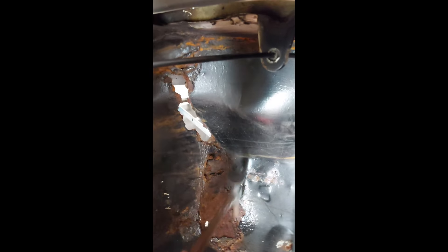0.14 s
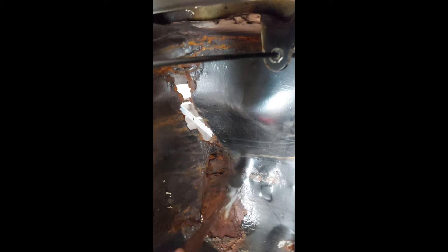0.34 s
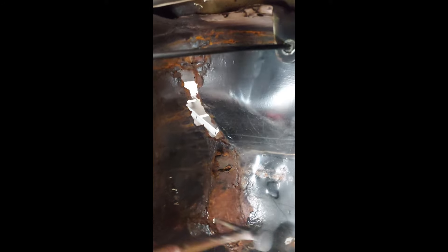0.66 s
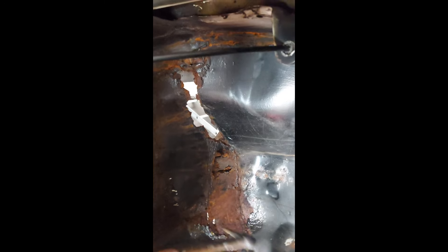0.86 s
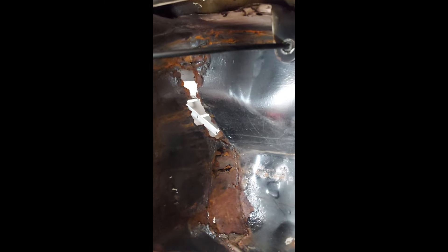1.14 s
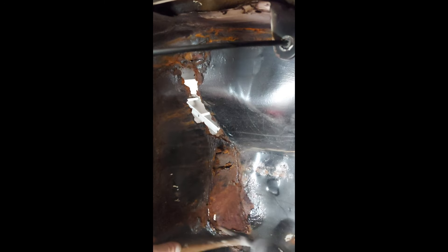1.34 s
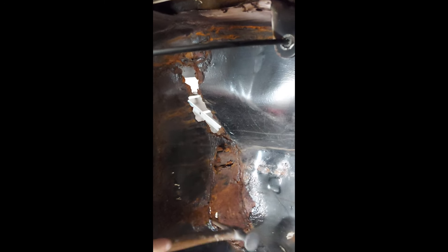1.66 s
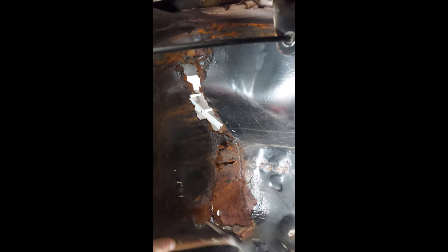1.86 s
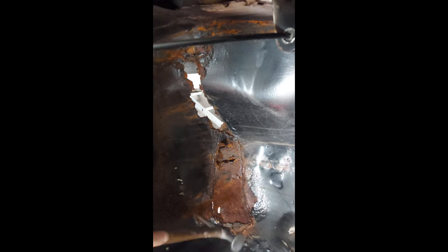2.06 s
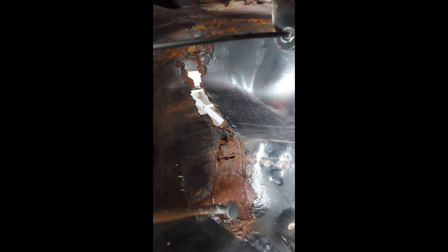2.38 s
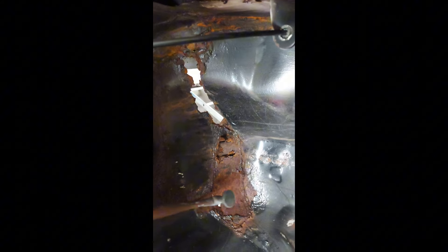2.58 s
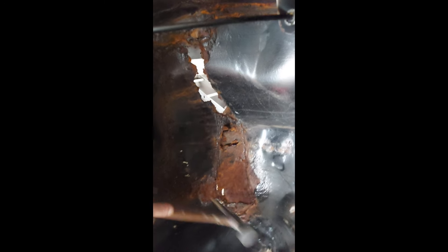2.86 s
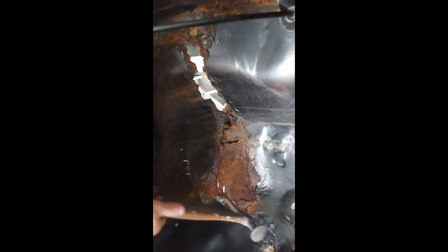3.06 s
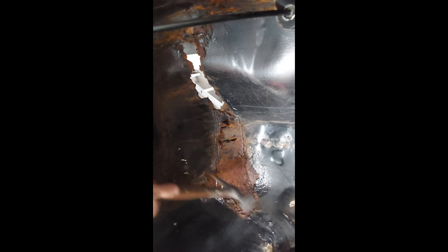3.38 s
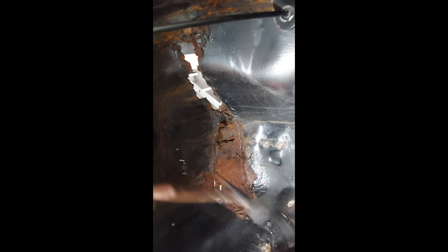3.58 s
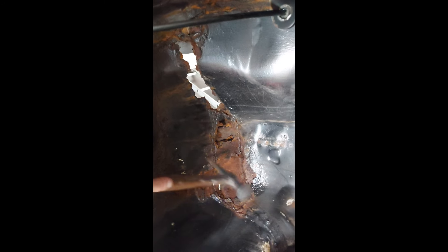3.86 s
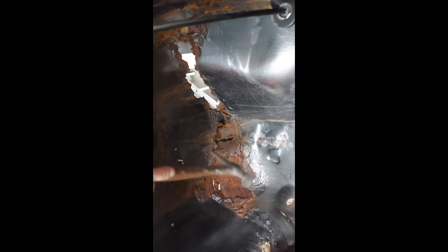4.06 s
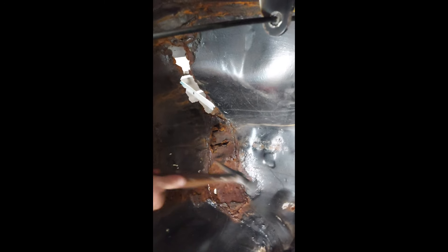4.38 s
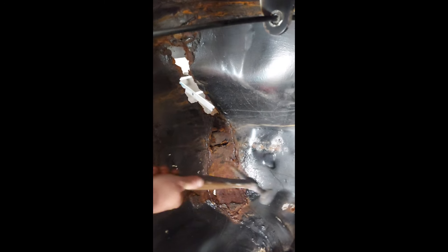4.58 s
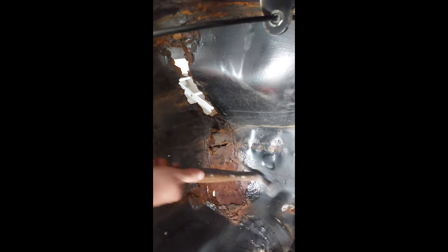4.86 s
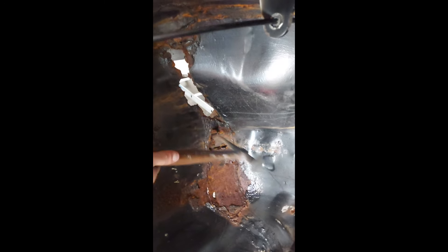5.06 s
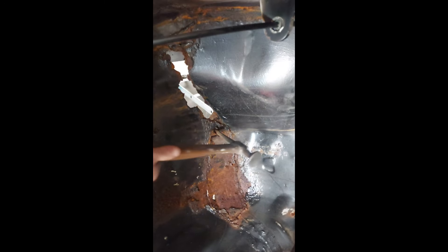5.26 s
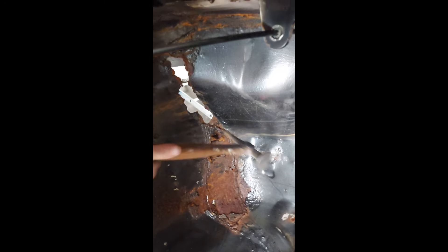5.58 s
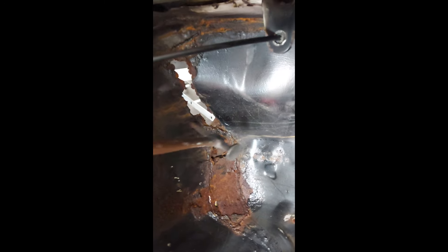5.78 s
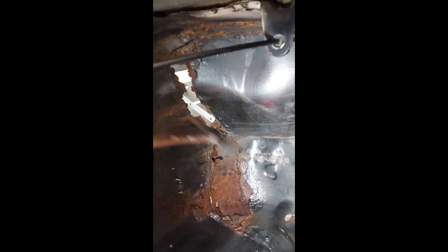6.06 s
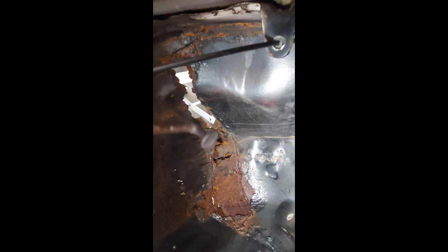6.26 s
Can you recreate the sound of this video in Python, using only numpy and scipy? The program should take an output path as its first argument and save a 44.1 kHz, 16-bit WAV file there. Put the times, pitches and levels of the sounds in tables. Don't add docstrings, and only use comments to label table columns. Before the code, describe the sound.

Close to a phone in a workshop, a small hammer taps a corroded steel car panel about four times a second. Every blow cracks sharply and sets the thin sheet ringing briefly, with a low boom on some hits. Flakes crunch and grit hisses downward. After a quick double hit the tapping stops for under a second, then resumes steadily to the end. The loudest blows clip.

```python
import sys
import numpy as np
from scipy import signal
from scipy.fft import rfft, irfft
from scipy.io import wavfile
from scipy.ndimage import uniform_filter1d, map_coordinates

SR = 44100
rng = np.random.default_rng(int(sys.argv[2]) if len(sys.argv) > 2 else 0)


def log_audio(samples):
    frames = np.atleast_2d(samples).T
    limited = np.clip(frames, -1, 1)
    pcm = np.round(limited * 32767).astype(np.int16)
    wavfile.write(sys.argv[1], SR, pcm)


def decibels_to_gain(level_db):
    exponent = np.asarray(level_db, float) / 20
    return 10 ** exponent


N = 283122


def evened(x):
    return x / np.sqrt(np.mean(x ** 2) + 1e-20)


def read(points, hz):
    f, value = np.transpose(points)
    return np.interp(np.log(hz + 1), np.log(f + 1), value)


def add(mix, s, sound):
    part = mix[..., round(s * SR):][..., :sound.shape[-1]]
    part += sound[..., :part.shape[-1]]


def coloured(x, spectrum):
    hz = np.fft.rfftfreq(x.shape[-1], 1 / SR)
    octaves_below = np.maximum(np.log2(spectrum[0][0] / (hz + 1)), 0)
    octaves_above = np.maximum(np.log2((hz + 1) / spectrum[-1][0]), 0)
    level_db = read(spectrum, hz) - 16 * (octaves_below + octaves_above)
    return evened(irfft(rfft(x) * decibels_to_gain(level_db), x.shape[-1]))


def burst(spectrum, t60, rise):
    t = np.arange(4096) / SR
    noise = coloured(rng.standard_normal((2, len(t))), spectrum)
    return noise * decibels_to_gain(-60 * t / t60) * (1 - np.exp(-t / rise))


def ringing(hz, t60, rise, phase=0):
    t = np.arange(16000) / SR
    fade = np.sqrt(1 - (t / t[-1]) ** 2)
    return fade * decibels_to_gain(-60 * t / t60) * (1 - np.exp(-t / rise)) * np.sin(2 * np.pi * hz * t + phase)


# [f/Hz, level/dB per Hz]
SHOP_AIR = [(15, -53.5), (25, -5), (53, -11.5), (70, -1.5), (124, -18), (150, -9), (179, -29.5),
            (200, -34.5), (260, -59.5), (440, -120)]


def shop_air():
    return decibels_to_gain(-46.5) * coloured(rng.standard_normal((2, N)), SHOP_AIR)


SURGE_RISE_S, SURGE_T60_S = 0.034, .7


def surges(per_body):
    out, t = np.zeros(N), np.arange(SR // 2) / SR
    for (s, *_), (body_db, *_) in zip(BLOWS, SPOTS):
        fall = decibels_to_gain(per_body * (body_db + 13.5) - 60 * t / SURGE_T60_S)
        add(out, s, fall * (1 - np.exp(-t / SURGE_RISE_S)))
    return out


# [t/s, flow level/dB, share of fine dust level/dB]
GRIT_FLOW = [(0.0, -49.5, -34), (0.3, -52, -22), (1.12, -53.5, -17), (1.3, -45.5, -16.5),
             (1.55, -49.5, -20.5), (2.1, -56, -16.5), (2.34, -55.5, -18), (2.5, -65, -20), (2.68, -61, -20),
             (2.74, -46, -31), (2.9, -47.5, -33), (3.2, -47.5, -23), (3.9, -48.5, -28), (4.3, -50.5, -32),
             (5.1, -47.5, -29), (5.45, -53, -28), (5.9, -49, -28), (6.42, -49, -32)]
# [f/Hz, level/dB per Hz]
GRIT_HISS = [(470, -27.5), (800, 1.5), (1100, -1.5), (1220, -6), (1390, 1), (1940, 2), (2700, -8),
             (4480, -17.5), (5590, -22.5), (6090, -20.5), (10000, -52.5), (13000, -93.5), (22000, -120)]
# [f/Hz, level/dB per Hz]
GRIT_RUMBLE = [(88, -29.5), (150, 9), (193, -0.5), (377, 0), (486, -3.5), (616, -11.5), (672, -7.5),
               (888, -62), (1000, -16), (1300, -31), (2200, -120)]
# [f/Hz, level/dB per Hz]
BRIGHT_TICK = [(9500, -10), (11000, -9), (13000, -3.5), (15800, -7.5), (16500, -32)]


def grit():
    s, flow_db, dust_db = np.transpose(GRIT_FLOW)
    t = np.arange(N) / SR
    flow = decibels_to_gain(np.interp(t, s, flow_db))
    dust = decibels_to_gain(np.interp(t, s, dust_db))
    shaken = flow * (1 + decibels_to_gain(0.5) * surges(per_body=0))
    landed = rng.random(N) < 5000 / SR
    size = decibels_to_gain(1.0 * np.minimum(rng.exponential(1, N), 5)) * landed
    grains = size * rng.standard_normal((2, N))
    out = shaken * (coloured(grains, GRIT_HISS) + dust * coloured(grains, BRIGHT_TICK))
    rumble = decibels_to_gain(1.5) * flow + decibels_to_gain(-28) * surges(per_body=0.73)
    return out + rumble * coloured(rng.standard_normal((2, N)), GRIT_RUMBLE)


# [t/s, level/dB]
HUM_SWELL = [
    (2.7, -86.5),
    (2.76, -44),
    (2.827, -38),
    (2.894, -44),
    (2.934, -33.5),
]
HUM_HZ = 132.5


def hum():
    s, db = np.transpose(HUM_SWELL)
    t = np.arange(N) / SR
    waver = evened(uniform_filter1d(rng.standard_normal(N), 1500))
    tone = np.sqrt(2) * np.sin(2 * np.pi * np.cumsum(HUM_HZ * (1 + 0.01 * waver)) / SR)
    return decibels_to_gain(np.interp(t, s, db, left=-100, right=-100)) * tone


# [t/s, level/dB, top above 10 kHz relative level/dB, length/s]
FLAKE_FALLS = [(0.19, -45.5, -18, 0.036), (0.447, -52.5, -36, 0.097), (0.8685, -34, -17.5, 0.077),
               (0.94, -42, -26, 0.048), (1.162, -36.5, -27, 0.046), (1.2141, -33, -22.5, 0.077),
               (1.237, -38, -12.5, 0.15), (1.294, -30.5, -22.5, 0.096), (1.4396, -34.5, -29.5, 0.035),
               (1.4756, -30.5, -18.5, 0.074), (1.707, -41.5, -25.5, 0.05), (1.7373, -24, -15.5, 0.062),
               (1.9, -39, -32, 0.059), (1.938, -39, -24, 0.07), (1.966, -45.5, -21, 0.29),
               (2.2085, -16.5, -19, 0.018), (2.221, -32, -22.5, 0.12), (2.2706, -29, -24.5, 0.048),
               (2.305, -37, -25.5, 0.056), (2.452, -42.5, -27, 0.015), (2.4693, -48.5, -22.5, 0.13),
               (2.5102, -49, -22, 0.14), (2.694, -32.5, -22.5, 0.14), (2.7167, -29.5, -18.5, 0.027),
               (3.3106, -33.5, -25, 0.041), (3.36, -34.5, -13.5, 0.042), (3.377, -31.5, -20.5, 0.096),
               (3.838, -36.5, -14.5, 0.03), (5.048, -31, -42.5, 0.017), (5.91, -30, -26, 0.025),
               (3.415, -44, -8, .03), (3.655, -46, -6, .03), (3.62, -46, -12, .02)]
# [f/Hz, level/dB per Hz]
FLAKE_CRUNCH = [(710, -39), (1200, -18.5), (2130, 2), (2670, -6), (3140, -6), (3630, -13.5), (6200, -11.5),
                (8760, -29.5), (10500, -57.5), (13600, -68), (22000, -120)]
# [f/Hz, level/dB per Hz]
FLAKE_THUD = [(500, -7), (670, 11), (800, -8.5), (1000, 1), (1200, -9.5)]
# [t/s, level/dB]
LUMP_FALLS = [(0.162, -40), (0.1942, -41), (0.4515, -39), (1.3028, -28.5), (1.4396, -33), (2.6985, -38),
              (5.0554, -24), (5.6606, -31.5), (5.878, -29), (5.9105, -32.5), (6.0553, -39), (6.1162, -57),
              (6.3094, -23)]
LUMP_S = 0.065


def flakes():
    out = np.zeros((2, N))
    for s, db, top_db, length in FLAKE_FALLS:
        length = np.clip(length, .005, .3)
        crumbs = evened(decibels_to_gain(2.5 * np.repeat(rng.standard_normal(size=64), repeats=64)))
        add(out, s, decibels_to_gain(db - 3.0) * crumbs * burst(FLAKE_CRUNCH, length, 0.00063))
        add(out, s, decibels_to_gain(db + top_db + 4.5) * crumbs * burst(BRIGHT_TICK, length, .0015))
        add(out, s, decibels_to_gain(db - 7.5) * burst(FLAKE_THUD, 1.6 * length, 0.0034))
    for s, db in LUMP_FALLS:
        crunch = decibels_to_gain(-19.5) * burst(FLAKE_CRUNCH, LUMP_S, .0015)
        top = decibels_to_gain(-28) * burst(BRIGHT_TICK, LUMP_S, .0015)
        add(out, s, decibels_to_gain(db) * (burst(FLAKE_THUD, LUMP_S, 0.0015) + crunch + top))
    return out


# [t/s, level/dB, t60/s]
SKID_TIMES = [
    (0.036, -37, .45),
    (0.279, -42, 1),
    (1.277, -37.5, .45),
    (5.046, -28.5, .65),
]
# [f/Hz, level/dB per Hz]
SKID_RASP = [(500, -5.5), (900, -1), (1500, 1), (2300, -5), (3200, -19.5), (6000, -31.5)]


def skids():
    out, t = np.zeros((2, N)), np.arange(16384) / SR
    for s, db, t60 in SKID_TIMES:
        rough = evened(decibels_to_gain(1.8 * np.repeat(rng.standard_normal(size=128), repeats=128)))
        rasp = coloured(rough * rng.standard_normal((2, len(t))), SKID_RASP)
        add(out, s, decibels_to_gain(db - 60 * t / t60) * (1 - np.exp(-t / .004)) * rasp)
    return out


# [t/s, f/Hz, level/dB, t60/s]
BOUNCE_HITS = [
    (6.2675, 375, -5, .08),
    (5.9975, 330, -8, .045),
    (5.0475, 240, -14, .1),
    (5.0475, 520, -18, .08),
    (5.5205, 300, -13, .04),
    (1.279, 700, -12, .06),
    (4.8145, 800, -14, .05),
]


def bounces():
    out = np.zeros(N)
    for s, hz, db, t60 in BOUNCE_HITS:
        add(out, s, decibels_to_gain(db) * ringing(hz, t60, .0004, np.pi))
    return out


# [t/s, f/Hz, level/dB, t60/s]
METAL_RINGS = [(.031, 1780, -4, 0.027), (0.273, 1372, -14, 0.053), (1.272, 718, -17.5, 0.29),
               (1.27, 878, -35.5, 0.38), (4.813, 1750, -15, 0.09), (5.5148, 642, -3, 0.047),
               (6.259, 870, -9, 0.072), (6.257, 2214, -13.5, 0.026), (.523, 2074, -2.5, 0.035),
               (.523, 1701, -26, .1), (.523, 2536, -24, .07), (.523, 2745, -23, .07),
               (.523, 3241, -28, .08), (.523, 1378, -22, .07), (.523, 2254, -23.5, 0.084),
               (.523, 2100, -33, 0.5), (.523, 2190, -35, .4), (0.522, 4775, -21, 0.06),
               (1.271, 2908, -31.5, 0.19), (1.272, 6270, -44, 0.057), (1.566, 15000, -54, 0.17),
               (3.213, 690, -12, .05), (5.27, 680, -12, .04), (1.737, 1300, -28, .04),
               (1.44, 2100, -36, .06), (3.212, 15900, -50.5, .15), (5.042, 2850, -35, 0.4),
               (5.043, 1410, -28, .25), (5.043, 1879, -28, .16), (5.043, 840, -28, .1),
               (5.04, 3420, -19, .04), (5.039, 1089, -32.5, 0.18), (5.041, 2200, -35.5, 0.14),
               (6.055, 340.7, -16.5, 0.14), (5.041, 1725, -21, 0.13), (5.041, 2090, -36, 0.47),
               (5.042, 6310, -37, 0.2), (5.041, 10620, -55, 0.11), (5.995, 6310, -29.5, 0.1),
               (6.256, 2850, -23, 0.25), (1.567, 1637, -26, 0.1), (1.567, 1290, -16, .04),
               (.765, 560, -23, .1), (5.9935, 860, -12, .045), (5.9935, 1125, -16, .05),
               (5.514, 2960, -16, .03), (1.274, 872, -14, .06), (1.272, 784, -16, 0.12)]
RUST_SPLIT, RUST_TWIN_DB = 4.57, -11
HEAD_ABOVE_HZ = 2800


def rings():
    ribs, head = np.zeros(N), np.zeros(N)
    for s, hz, db, t60 in METAL_RINGS:
        twin = decibels_to_gain(RUST_TWIN_DB) * ringing(hz + RUST_SPLIT / t60, t60, 0.000058)
        add(head if hz > HEAD_ABOVE_HZ else ribs, s, decibels_to_gain(db - 2.0) * (ringing(hz, t60, 0.00006) + twin))
    return ribs, head


def push():
    t = np.arange(400) / SR
    return -np.sin(2 * np.pi * 420 * t) * np.exp(-(t / 0.001) ** 2)


# [f/Hz, level/dB per Hz]
CRACK_COLOUR = [(470, -30.5), (800, -2.5), (910, -4.5), (1810, -1.5), (2480, -6), (4530, -18), (6330, -15),
                (7360, -21.5), (9330, -32.5), (10500, -27.5), (13600, -72), (22000, -120)]
# [f/Hz, t60/s]
CRACK_FADE = [(800, 0.17), (2400, 0.09), (6400, 0.071), (15000, 0.032)]
RIB_PITCHES = [1100, 1650, 2300, 3300, 5300]


def crack(modes_hz, bright_db, haze_db, ribs_db, build_s):
    colour = [(f, db + bright_db * np.clip(np.log2(f / 1800), 0, 2)) for f, db in CRACK_COLOUR]
    hz = np.union1d(np.transpose(colour)[0], RIB_PITCHES)
    colour = list(zip(hz, read(colour, hz) + read(list(zip(RIB_PITCHES, ribs_db)), hz)))
    hz, t, z = signal.stft(coloured(rng.standard_normal((2, 6000)), colour), SR, nperseg=128)
    fading = z * decibels_to_gain(-60 * t / read(CRACK_FADE, hz)[:, None])
    haze = signal.istft(fading, SR, nperseg=128)[1][:, :4096]
    u, v = rng.standard_normal((2, len(modes_hz), 1))
    t, f = np.arange(4096) / SR, modes_hz[:, None]
    knock_db = read(colour, f) + 3.5 * u - 60 * t / (0.32 * read(CRACK_FADE, f))
    knock = (decibels_to_gain(knock_db) * np.sin(2 * np.pi * (f * t + 0.17 * v))).sum(axis=0)
    knock = knock * (1 - np.exp(-t / 0.00078))
    snap = burst(colour, 0.017 + 5.0 * build_s, 0.00009)
    return (1 - np.exp(-(t / build_s) ** 2)) * (snap + decibels_to_gain(haze_db) * haze + decibels_to_gain(-12) * knock)


# [f/Hz, level/dB, t60/s]
PANEL_MODES = [(48.8, -8.5, 0.71), (64.26, -4.5, 0.96), (87.55, -14, 1), (105.7, 8.5, 0.27),
               (130.2, -2, 0.53), (151.4, 7, 0.27), (178.2, -8.5, 0.32), (215.8, -7.5, 0.44),
               (229, 2, 0.18), (252.7, -3.5, 0.22), (288.2, -2, 0.14), (306.7, -4.5, 0.41),
               (349.7, -9, 0.38), (376, 3, 0.22), (394.3, -7, 0.36), (428.7, -15, 0.43), (468, 7.5, 0.056),
               (517, -3, 0.46), (546.7, 0.5, 0.16), (599, -8, 0.31), (660, 3.5, 0.12), (711, -12, 0.29),
               (833, -10, 0.28), (923, -17, 0.36)]
FAMILY_EDGES = [125, 180, 330, 450, 620]
BODY_FOCUS_DB, BODY_FOCUS_HZ = -2.5, 45


def sheet(family_db, damping_db, body_hz):
    modes_hz, modes_db, t60 = np.transpose(PANEL_MODES)[..., None]
    t = np.arange(16000) / SR
    family = np.searchsorted(FAMILY_EDGES, modes_hz)
    is_body, is_damped = family == 2, np.isin(family, (3, 4))
    quick = np.isin(family, (2, 4, 5))
    first = 1 + 1.79 * quick * np.exp(-t / 0.0073)
    away_db = BODY_FOCUS_DB * ((modes_hz - body_hz) / BODY_FOCUS_HZ) ** 2 * is_body
    away_db = away_db - damping_db * is_damped * t
    u, v, w = rng.standard_normal((3,) + modes_hz.shape)
    rise = (9 / modes_hz) ** 2 + 0.19 / modes_hz
    modes = ringing(modes_hz * (1 + 0.012 * v), t60, rise, np.pi + .3 * w)
    return (first * decibels_to_gain(family_db[family] + modes_db + away_db + 1.2 * u) * modes).sum(axis=0)


# [t/s, crack level/dB, boom of the loose sheet level/dB,
#                sharpness: tick above 10 kHz relative to the crack level/dB]
BLOWS = [(0.03, -13.5, -31.5, -22.5), (0.2741, -8.5, -31, -24), (0.5226, -9.5, -20, -10.5),
         (0.7635, -6.5, -11.5, -17), (1.0257, -10.5, -10.5, -18), (1.2721, -6.5, -11.5, -18),
         (1.5658, -11.5, -12.5, -11.5), (1.8166, -13, -14, -18), (2.069, -14, -15.5, -20.5),
         (2.1626, -21.5, -14.5, -13.5), (2.9506, -10, -8, -17), (3.2115, -6.5, -6.5, -14),
         (3.446, -12.5, -8, -16.5), (3.6733, -5, -15, -24), (3.9153, -9, -17.5, -20),
         (4.12, -7, -20, -26.5), (4.375, -11.5, -20.5, -27), (4.596, -7, -14, -26), (4.813, -6.5, -14, -22),
         (5.034, -3, -34.5, -24), (5.2687, -9.5, -20, -15), (5.5116, -10, -18, -10.5),
         (5.7564, -7, -16.5, -18.5), (5.9895, -7, -22.5, -18), (6.254, -8, -18, -13.5)]
# [body near 250 Hz level/dB, clang near 380 Hz level/dB,
#                               modes near 520 Hz level/dB, clank near 700 Hz level/dB]
SPOTS = [(-17.0, -22.5, -15.5, -14.5), (-15.5, -25.0, -12.5, -27.0), (-21.0, -29.0, -23.5, -29.0),
         (-14.0, -16.5, -23.5, -30.5), (-13.0, -18.5, -22.0, -15.0), (-15.0, -19.0, -15.5, -7.5),
         (-11.0, -20.5, -20.0, -22.0), (-13.5, -20.5, -21.5, -19.5), (-14.5, -16.5, -19.0, -15.5),
         (-19.5, -23.5, -25.5, -18.5), (-11.5, -19.0, -18.5, -14.0), (-13.5, -15.5, -17.5, -26.5),
         (-9.0, -11.5, -10.5, -11.5), (-17.0, -17.0, -15.5, -13.0), (-14.0, -19.0, -14.0, -15.5),
         (-15.0, -12.0, -21.0, -20.5), (-14.5, -10.5, -17.0, -19.0), (-10.5, -18.5, -14.0, -23.0),
         (-12.0, -12.0, -19.5, -12.5), (-21.0, -29.0, -22.0, -47.0), (-10.0, -19.0, -19.0, -16.0),
         (-15.0, -28.0, -19.5, -18.0), (-13.0, -21.5, -12.5, -14.5), (-15.0, -22.5, -14.5, -18.0),
         (-16.0, -21.0, -20.0, -15.0)]
# [sheet gives way this late t/ms, dent level/dB, crack builds in t/ms,
#                               extra damping/dB per s, body pitch f/Hz]
CONTACTS = [(1.0, 0.0, 0.5, -31.0, 250.0), (0.6, 0.0, 0.2, -28.0, 250.0), (1.0, -12.0, 0.8, -20.0, 249.0),
            (0.1, -2.0, 0.4, 7.0, 273.0), (0.3, 0.0, 0.2, 15.0, 244.0), (-0.3, -2.0, 0.2, -24.0, 235.0),
            (1.2, -8.0, 0.6, -32.0, 248.0), (0.6, 0.0, 0.2, -17.0, 230.0), (0.8, 0.0, 0.2, 13.0, 261.0),
            (0.1, -15.0, 0.2, -11.0, 249.0), (0.3, 0.0, 0.2, -33.0, 250.0), (0.5, -2.0, 0.5, 32.0, 234.0),
            (-1.0, 0.0, 0.2, 37.0, 236.0), (2.0, -2.0, 0.6, -1.0, 230.0), (1.3, 0.0, 0.3, -19.0, 227.0),
            (0.1, 0.0, 0.1, -15.0, 239.0), (0.1, 0.0, 0.1, 9.0, 243.0), (0.8, 0.0, 0.2, -36.0, 225.0),
            (0.8, -3.0, 0.3, -4.0, 238.0), (6.0, -12.0, 6.0, -8.0, 234.0), (0.3, 0.0, 0.2, 50.0, 230.0),
            (1.3, -8.0, 0.8, 13.0, 227.0), (0.3, -5.0, 0.2, 73.0, 223.0), (3.5, -8.0, 2.5, 23.0, 285.0),
            (3.0, -2.0, 2.5, -40.0, 297.0)]
BLOW_RIBS = [(0.0, -0.0, -2.5, 1.5, -4.0), (-2.5, -1.0, 0.5, 0.5, 1.0), (-4.0, 0.5, -1.0, 1.0, 2.0),
             (5.0, -6.5, -5.0, -2.5, -0.0), (-5.0, 3.0, 3.5, -4.5, 1.0), (2.5, -0.0, 1.5, -2.5, -2.0),
             (6.0, 3.5, 3.0, -5.5, 4.0), (0.5, -2.0, 2.0, 1.5, -2.5), (-0.0, -2.5, -2.0, -2.0, 3.0),
             (1.0, 0.0, 7.0, 4.5, 2.5), (3.5, -5.0, 3.5, 2.5, -1.5), (-3.0, -0.5, -3.5, 0.5, 1.5),
             (1.0, 2.0, 3.5, -3.5, 2.5), (-4.5, 2.5, -0.0, 1.0, 1.0), (-0.5, -2.0, -3.0, -3.5, 2.0),
             (-3.0, 0.5, 1.0, -2.0, 1.0), (0.5, 1.5, -2.0, -0.5, 0.0), (-0.0, 1.5, -2.0, 3.0, -0.5),
             (-7.0, -1.0, -2.5, -4.5, -0.0), (-1.5, -0.5, 0.0, 2.5, 6.0), (2.0, -4.0, -0.0, -6.5, 1.0),
             (3.5, 1.0, -1.5, 5.0, 3.5), (-0.5, -4.0, 2.5, -1.5, 1.5), (-0.5, -2.0, 5.0, 1.0, 1.0),
             (-1.0, -1.0, 2.0, -0.5, 1.5)]
# [t/s, level/dB]
HAMMER_REST = [
    (2.22, 0.5),
    (2.42, -14),
    (2.6, -9),
    (2.9, -14),
    (2.94, -1),
]
BOOM_DB, BODY_DB, CLANG_DB, UPPER_DB, CLANK_DB = -2.5, -5, -0.53, -9, -10.5
USUAL_BOOM_DB, USUAL_SHARP_DB = -16, -20
TICK_LAG_S = .0004


def hammer():
    panel, sharp = np.zeros(N), np.zeros((2, N))
    patch_hz = np.geomspace(900, 7000, num=36) * rng.uniform(1.0, 1.02, size=36)
    for blow, spot, contact, ribs_db in zip(BLOWS, SPOTS, CONTACTS, BLOW_RIBS):
        s, crack_db, boom_db, sharp_db = blow
        body_db, clang_db, upper_db, clank_db = spot
        late_ms, dent_db, build_ms, damping_db, body_hz = contact
        build_s, gives = max(build_ms, .02) / 1000, s + late_ms / 1000
        thump_db = -22 + 1.14 * (boom_db - USUAL_BOOM_DB)
        family_db = np.array([boom_db + BOOM_DB, thump_db, body_db + BODY_DB, clang_db + CLANG_DB,
                              upper_db + UPPER_DB, clank_db + CLANK_DB])
        add(panel, gives, sheet(family_db, damping_db, body_hz))
        add(panel, gives, decibels_to_gain(family_db[2:5].max() + dent_db + 3.0) * push())
        bright_db = -1.5 + 0.28 * (sharp_db - USUAL_SHARP_DB)
        haze_db = -11 - .25 * (sharp_db - USUAL_SHARP_DB)
        add(sharp, s, decibels_to_gain(crack_db - 3) * crack(patch_hz, bright_db, haze_db, ribs_db, build_s))
        tick = burst(BRIGHT_TICK, .014, 0.00037) + decibels_to_gain(-10.5) * burst(BRIGHT_TICK, 0.061, 0.002)
        add(sharp, s + build_s + TICK_LAG_S, decibels_to_gain(crack_db + sharp_db) * tick)
    return panel * decibels_to_gain(np.interp(np.arange(N) / SR, *np.transpose(HAMMER_REST))), sharp


FLEX_MS, FLEX_SPAN_S = .08, .02


def flexed(x):
    span = round(FLEX_SPAN_S * SR)
    wander = evened(uniform_filter1d(uniform_filter1d(rng.standard_normal(N), span), span))
    return map_coordinates(x, [np.arange(N) + FLEX_MS * SR / 1000 * wander], order=3, mode='nearest')


def detour(x):
    taps = np.zeros(540)
    taps[rng.integers(20, 540, size=9)] = rng.standard_normal(size=9)
    return signal.oaconvolve(x, taps / np.linalg.norm(taps))[:N]


# [f/Hz, share]
PORT_SAME = [(130, 1), (250, 0.92), (600, 0.82), (1200, 0.88), (4000, 0.75), (12000, .88)]
# [f/Hz, level/dB]
PORT_LEAN = [(200, .6), (380, 1), (700, -1.2), (1290, 1.6), (2380, 4.4), (4400, 4.2), (8120, 8),
             (15000, 13)]
# [f/Hz, phase/radians]
PORT_LEAD = [(400, 0.048), (800, 1.23), (1500, 1.93), (3000, 1.4), (6000, 1.42), (15000, 1.4)]


def ports(first, second):
    hz = np.fft.rfftfreq(N, 1 / SR)
    same, lean = np.clip(read(PORT_SAME, hz), 0, 1), decibels_to_gain(read(PORT_LEAN, hz) / 2)
    a, b = rfft(first), rfft(second)
    right = (same * a + np.sqrt(1 - same ** 2) * b) * np.exp(-1j * read(PORT_LEAD, hz))
    level = 2 / np.sqrt(lean ** 2 + lean ** -2)
    return decibels_to_gain(0.5) * irfft(level * np.array([a * lean, right / lean]), N)


def scene():
    air, trickle, tone = shop_air(), grit(), hum()
    falling, rasp = flakes(), skids()
    ribs, head = rings()
    panel, sharp = hammer()
    noisy = sharp + falling + trickle + air
    metal = flexed(panel + ribs + bounces() + tone) + head
    other = detour(metal + noisy[1])
    return ports(metal + noisy[0] + rasp[0], other + rasp[1])


PORT_DIP_HZ, PORT_DIP_WIDTH_HZ, PORT_DIP_SHARE = 9650, 2330, 0.54


def port_dip(x):
    band = signal.lfilter(*signal.iirpeak(PORT_DIP_HZ, PORT_DIP_HZ / PORT_DIP_WIDTH_HZ, fs=SR), x)
    return x - np.clip(PORT_DIP_SHARE, 0, 1) * band


# [f/Hz, level/dB relative to the sound]
SMEAR_NOISE = [(100, -26), (400, -11), (1500, -7.5), (6000, -4.5), (9500, -8), (15000, -9)]
SMEAR_APART = .6


def smear(x):
    hz, t, z = signal.stft(x, SR, nperseg=1024, noverlap=768)
    a, b = rng.standard_normal((2, 3) + z.shape[1:])
    noise = a + 1j * b
    error = np.sqrt(1 - SMEAR_APART ** 2) * noise[:1] + SMEAR_APART * noise[1:]
    error = z * decibels_to_gain(read(SMEAR_NOISE, hz))[:, None] * error
    return x + signal.istft(error, nperseg=1024, noverlap=768)[1][:, :N]


def band_limit(x):
    return signal.sosfilt(signal.butter(12, 16350, fs=SR, output="sos"), x)


def record(dry):
    dry = signal.sosfilt(signal.butter(2, 42, 'high', fs=SR, output='sos'), dry)
    power_db = 10 * np.log10(abs(uniform_filter1d((dry ** 2).mean(0), 400)) + 1e-12)
    fall = np.arange(N) * 98.4 / SR
    over_db = np.clip(np.maximum.accumulate(power_db + fall) - fall + 25.5, 0, 9.)
    late = round(.064 * SR)
    over_db = np.concatenate([np.zeros(late), over_db[:-late]])
    ducked = dry / decibels_to_gain(0.35 * uniform_filter1d(over_db, 150))
    clipped = np.clip(ducked, -1, 1)
    mix = np.clip(smear(port_dip(clipped)), -1, 1)
    return band_limit(mix)


dry = scene()
out = record(dry)
log_audio(out)
```